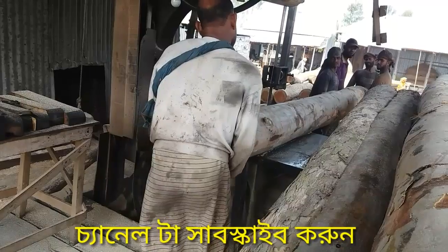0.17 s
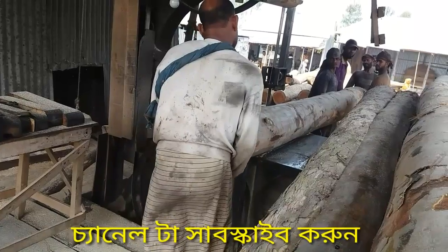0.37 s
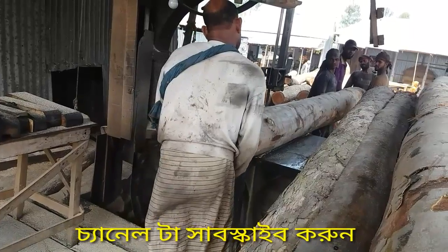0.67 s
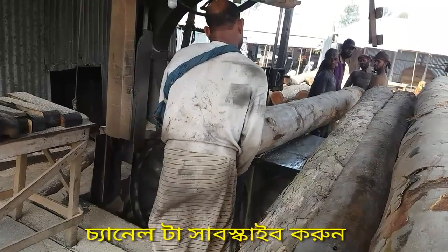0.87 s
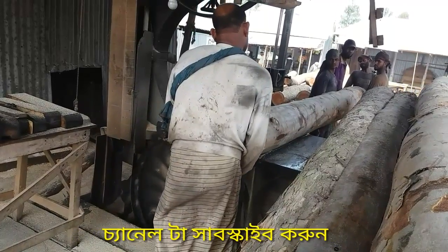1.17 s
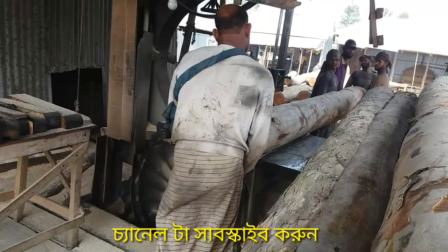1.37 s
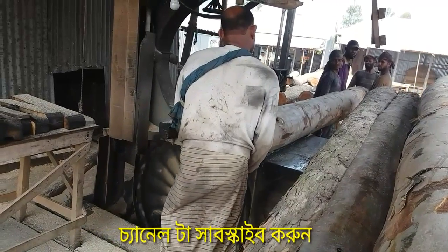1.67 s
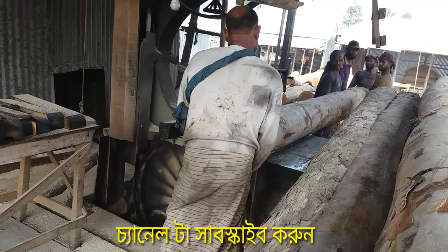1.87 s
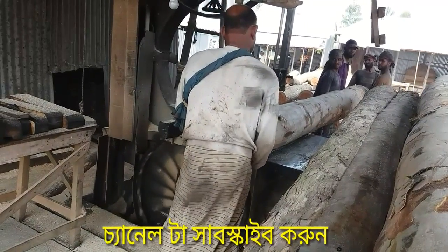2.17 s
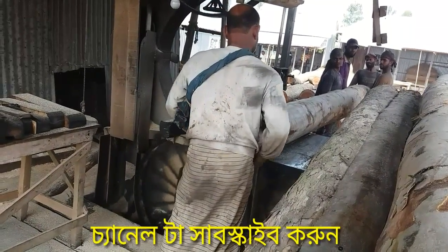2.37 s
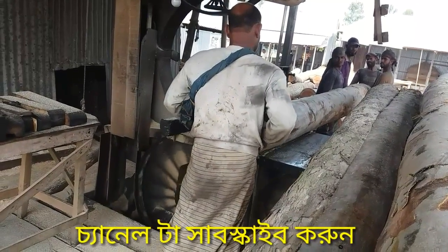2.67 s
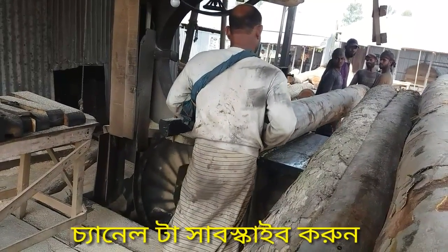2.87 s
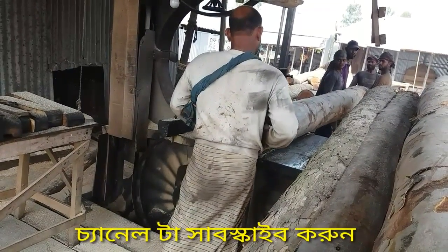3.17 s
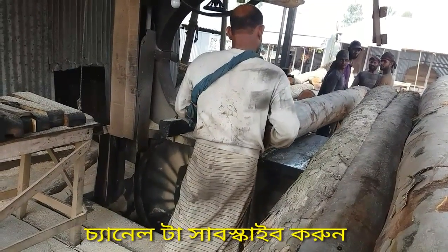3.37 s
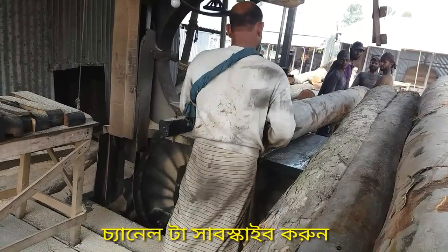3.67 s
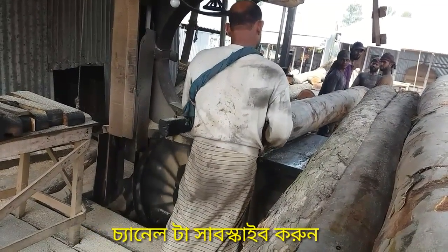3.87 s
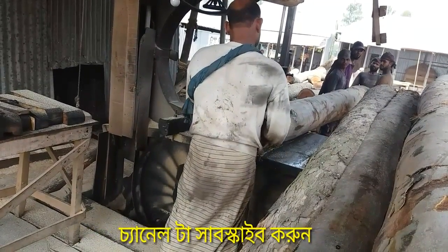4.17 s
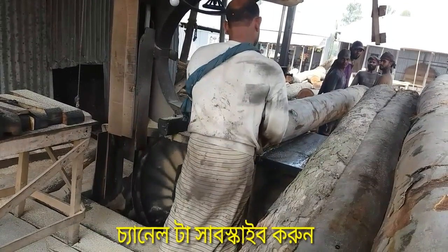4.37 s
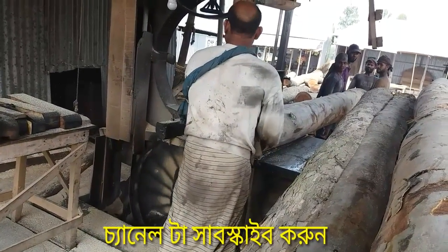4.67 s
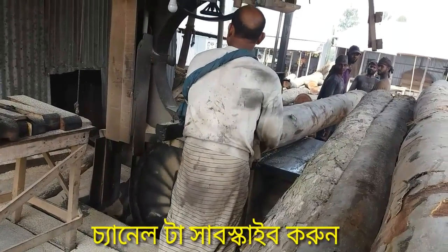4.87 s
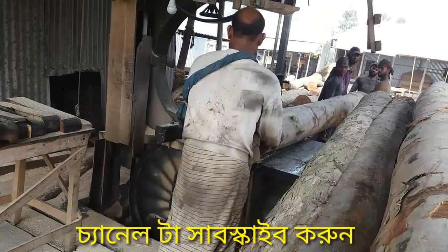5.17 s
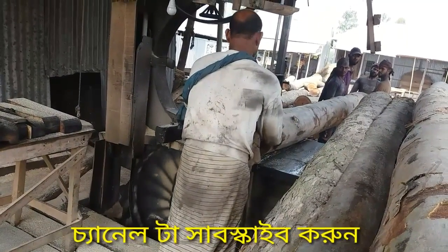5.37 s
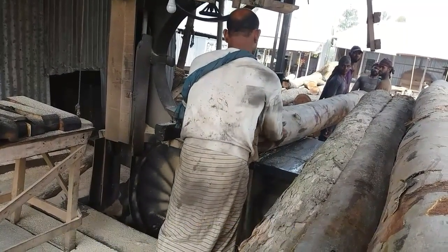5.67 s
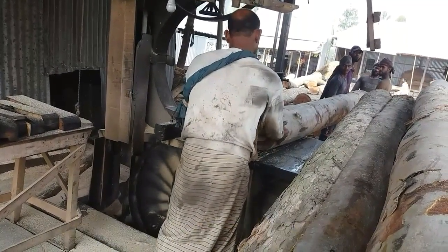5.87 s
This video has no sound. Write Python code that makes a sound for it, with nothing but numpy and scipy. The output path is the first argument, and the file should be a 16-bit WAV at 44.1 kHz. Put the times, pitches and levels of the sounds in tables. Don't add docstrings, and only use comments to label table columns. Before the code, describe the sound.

In an open shed, a large band saw is already deep in a log. A single-cylinder diesel thuds and knocks about eleven times a second beneath a steady roar of belts and wheels. Teeth hiss brightly, the blade rings around 2 kHz and gives short squeaks and rasps. Roughly every 0.8 seconds a fizzy swell ends in a light brush. One mono microphone; everything gradually fades to faint.

```python
import sys
import numpy as np
from scipy import signal
from scipy.fft import rfft, irfft, next_fast_len
from scipy.io import wavfile
from scipy.ndimage import uniform_filter1d, map_coordinates

SR = 44100
rng = np.random.default_rng(int(sys.argv[2]) if len(sys.argv) > 2 else 0)


def wav_record(signal):
    frames = np.transpose(np.atleast_2d(signal))
    bounded = np.clip(frames, -1, 1)
    quanta = np.round(bounded * 32767).astype(np.int16)
    wavfile.write(sys.argv[1], SR, quanta)


def ratio(d):
    e = np.asarray(d, float) / 20
    return 10 ** e


N = 265305
WELD_AT_S, WELD_EVERY_S = .63, .788


def unit(x):
    return x / np.sqrt(np.mean(x ** 2) + 1e-20)


def curves(rows):
    s, *cols = np.transpose(rows)
    return [np.interp(np.arange(N) / SR, s, c) for c in cols]


def wobble(rate):
    knots = rng.standard_normal(int(N * rate / SR) + 4)
    return map_coordinates(knots, [np.arange(N) * rate / SR])


def coloured(x, points):
    m = next_fast_len(len(x) + 8192)
    hz, db = np.transpose(points)
    log_f = np.log(np.fft.rfftfreq(m, 1 / SR) + 1)
    gain = ratio(np.interp(log_f, np.log(hz), db, left=-120, right=-120))
    return irfft(rfft(x, m) * gain, m)[:len(x)]


def rush(points, patchy_db):
    z = signal.stft(rng.standard_normal(N + 512), nperseg=512)[2]
    field = uniform_filter1d(rng.standard_normal(z.shape), size=6, axis=0)
    field = uniform_filter1d(field, size=10, axis=1)
    patchy = signal.istft(z * ratio(patchy_db * unit(field)), nperseg=512)[1][:N]
    return unit(coloured(patchy, points))


def singing(hz, wander_hz, rate):
    pitch = hz + wander_hz * wobble(rate)
    return np.sqrt(2) * np.sin(2 * np.pi * np.cumsum(pitch) / SR)


def diesel_engine():
    # t/s, rate/(engine cycles per s)
    mean_speed = [(0, 11.562), (1.5, 11.364), (3, 11.395), (4.5, 11.4315), (6.02, 11.541)]
    # [(f/Hz, level/dB, t60/s) of what each one rings]
    pushes = [
        (.039, [(150.5, -6.5, .3), (181.5, -.1, .17), (263.4, .1, .08)]),
        (.497, [(99, -7.7, .18), (71.2, -9.2, .3), (236, -12, .25), (168.5, 3.3, .11), (185, 4.5, .035)]),
        (.837, [(134.3, -5.9, .22), (190.7, -6, .3), (305, -.3, .15), (50, -11, .14)]),
    ]
    # f/Hz, level/dB, t60/s
    block_modes = [(365, -15.5, 0.3), (396.2, -13.5, 0.33), (435.4, -17.5, 0.71), (508.4, -15, 0.25),
                   (672, -6, 0.075), (736, -7, 0.19), (812, -3.5, 0.2), (870, 2, .12), (886, -5, 0.2),
                   (953.7, -5.5, 0.13), (1017, 0, 0.22), (1125, -5.5, 0.25), (1196, -4.5, 0.17),
                   (1352, -3, 0.063), (1702, -5.5, 0.062)]
    # delay/s, level/dB
    walls = [(.0085, -4.5), (.018, -2.5), (.031, -7.5)]
    first_cycle, knock_share = -.082, .33
    loop_s, sag_at_s, sag_per_s = .768, .722, .081
    scatter_db, loose_db, knock_db = .5, 2.4, -5.6

    lead = SR // 2
    loop_phase = 2 * np.pi * (np.arange(N) / SR - sag_at_s) / loop_s
    speed = curves(mean_speed)[0] - sag_per_s * np.cos(loop_phase)
    run_in = np.full(lead, speed[0])
    turns = first_cycle + np.cumsum(np.r_[run_in, speed]) / SR - lead * speed[0] / SR
    t = np.arange(SR // 3) / SR
    sizes = rng.standard_normal((100, len(pushes) + len(block_modes)))

    def repeat(shape, share, db):
        starts = np.flatnonzero(np.diff(np.floor(turns - share)))
        train = np.zeros(N + lead)
        train[starts] = ratio(db[:len(starts)])
        return signal.oaconvolve(train, shape)[lead:lead + N]

    thud = knock = 0
    for k, (share, modes) in enumerate(pushes):
        ring = sum((-1) ** (j + 1) * ratio(db - 60 * t / t60) * np.sin(2 * np.pi * hz * t)
                   for j, (hz, db, t60) in enumerate(modes))
        thud = thud + repeat(ring * (1 - np.exp(-t / .002)), share, scatter_db * sizes[:, k])
    for k, (hz, db, t60) in enumerate(block_modes):
        ring = ratio(db - 60 * t / t60) * np.sin(2 * np.pi * (hz * t + .5 * rng.random()))
        ring = ring * (1 - np.exp(-t / .0016))
        knock = knock + repeat(ring, knock_share, loose_db * sizes[:, len(pushes) + k])
    knock = knock + sum(ratio(db) * np.roll(knock, round(s * SR)) for s, db in walls)
    return unit(thud) + ratio(knock_db) * unit(knock)


def machine_roar():
    # f/Hz, level/(dB per Hz)
    roar_colour = [(25, -27), (60, -13), (140, -14.5), (200, -13.5), (290, -5.5), (400, -15.5), (570, -15),
                   (850, -10), (1600, -12.5), (2050, -7.5), (2500, -13.5), (3070, -27), (4000, -15.5)]
    return ratio(-3 + .17 * wobble(rate=8)) * rush(roar_colour, patchy_db=1.0)


def teeth_hiss():
    # f/Hz, level/(dB per Hz)
    hiss_colour = [(2200, -6), (3070, -3.5), (4000, -4.5), (5000, -2.5), (6300, -5.5), (7700, -14),
                   (9500, -16.5), (13200, -19.5)]
    return ratio(-8.0 + .76 * wobble(rate=10)) * rush(hiss_colour, patchy_db=1.22)


def blade_modes():
    # f/Hz, width/Hz, level/dB
    modes = [(1938, 4.1, 4), (1663, 6.4, -3.5), (1836, 16, -3), (2124, 13, 2), (2187, 9.7, 3),
             (2350, 5, -16), (2356, 15, -0.5), (2470, 12, -35), (3270, 25, -4), (3615, 20, -5),
             (4140, 25, 0), (4465, 20, -1)]
    m = next_fast_len(N + SR)
    f = np.fft.rfftfreq(m, 1 / SR)
    body = sum(ratio(db) * 1j * f * np.sqrt(w) / (c * c - f * f + 1j * f * w) for c, w, db in modes)
    settled = irfft(rfft(rng.standard_normal(m)) * body, m)[SR // 2:]
    return unit(settled[:N])


def swelling(rest_db, swells):
    rise_s, fall_s = .011, .018
    t = np.arange(0, N, 64) / SR
    peaks = sum(ratio(db) * np.exp(-np.abs(t - s) / np.where(t < s, rise_s, fall_s)) for s, db in swells)
    return ratio(rest_db + 3 * wobble(rate=16)) + np.interp(np.arange(N) / SR, t, peaks)


def blade_rings():
    # t/s, level/dB, f/Hz
    lower_rest = [(0, -8.5, 1970), (1.45, -12.5, 1960), (1.6, -26, 1965), (2.1, -15, 1965),
                  (2.3, -11.5, 1975), (2.75, -9, 1984), (3.0, -11, 1969), (3.8, -11, 1970),
                  (4.0, -15, 1966), (4.4, -8.5, 1964), (5.3, -11, 1960), (6.02, -8, 1975)]
    # t/s, peak level/dB
    lower_swells = [(.22, -7), (.37, 2.5), (.53, -10), (1.02, 4), (1.26, -9), (1.46, -7), (2.76, -8),
                    (3.08, -11), (3.5, -7), (4.25, -4), (4.77, -3), (4.98, -1), (5.41, 0), (5.95, -8)]
    upper_swells = [(.42, 0), (.51, 0.5), (.75, -3), (1.46, -8), (2.45, -12), (2.76, -6), (2.91, -4),
                    (3.85, -10), (4.25, -3), (4.77, -9), (5.03, -2)]
    rest_db, lower_hz = curves(lower_rest)
    lower = swelling(rest_db, lower_swells) * singing(lower_hz, wander_hz=5.6, rate=32)
    upper = swelling(rest_db - 5, upper_swells) * singing(2029, wander_hz=5.6, rate=32)
    return lower + upper


def rub_list():
    # t/s, f/Hz, length/s, level/dB
    flares = [(0, 3990, .017, -0.5), (0.768, 3900, 0.064, -6), (.82, 4130, 0.15, -11),
              (0.885, 4870, 0.066, -3), (1.6, 4050, 0.11, -4.5), (1.828, 4670, 0.037, 1),
              (2.446, 5410, 0.042, -3.5), (2.482, 5930, .058, -8.5), (2.551, 5200, .039, -5),
              (3.636, 4950, 0.043, -6), (5.206, 5500, 0.048, -5.5)]
    # t/s, f/Hz, length/s, level/dB
    squeaks = [(.105, 4134, 0.075, -5), (.148, 4470, 0.064, -4.5), (.228, 4220, 0.063, -7),
               (0.302, 4392, 0.042, -5), (0.863, 4260, .054, -5), (0.969, 4180, 0.095, -8),
               (1.036, 4520, 0.038, -1.5), (1.251, 4770, .03, -7), (1.56, 3570, 0.044, -8),
               (1.591, 4880, .018, 4), (1.505, 5420, .03, -8), (1.697, 5600, .07, -7.5),
               (1.755, 5000, .03, -10), (2.381, 5100, .018, 0.5), (2.545, 4380, .036, -2),
               (2.624, 4810, .055, 1.5), (2.685, 4260, 0.075, -8), (2.847, 5540, 0.039, -4),
               (3.168, 5090, .052, -3.5), (3.267, 5370, .072, -7), (3.348, 4610, 0.029, -3.5),
               (3.415, 4800, 0.053, -0.5), (4.061, 4800, .041, -7), (4.209, 4680, 0.06, -4),
               (4.91, 4730, 0.047, -7), (4.97, 4930, .041, -5), (5.725, 4565, .041, -7)]
    passes = WELD_AT_S + WELD_EVERY_S * np.arange(7)
    wide = [(s, hz, 1280, length, db) for s, hz, length, db in flares]
    narrow = [(s, hz, 520 + 6500 * length, length, db) for s, hz, length, db in squeaks]
    lead_ins = [(s - .09, 7660, 1340, .055, -19.5) for s in passes]
    welds = [(s, 6800, 1340, .055, -10.5) for s in passes]
    return wide + narrow + lead_ins + welds


def blade_rubs():
    pitch_scatter, time_scatter, cycles = .427, .46, 2.5
    out = np.zeros(N + SR)
    t = np.arange(-SR // 10, SR // 10) / SR
    for s, hz, spread_hz, length, db in rub_list():
        draw = rng.standard_normal((40, 3))
        age = t - np.clip(time_scatter * length * draw[:, :1], -.09, .09)
        loose_hz = max(spread_hz - 420, 120)
        pitch = hz + pitch_scatter * loose_hz * draw[:, 1:2]
        envelope = ratio(1.8 * draw[:, 2:]) * np.exp(-(age * min(loose_hz, 600) / cycles) ** 2)
        slips = envelope * np.sin(2 * np.pi * pitch * age)
        out[round(s * SR):][:len(t)] += ratio(db) * unit(slips.sum(0)) * np.sqrt(5 * length)
    return out[SR // 10:][:N]


def frame_hums():
    # t/s, length/s, f/Hz, level/dB
    hums = [
        (0.04, 0.47, 473, -28.5),
        (0.573, .05, 672, -24),
        (.9, .22, 668, -39),
        (1.85, 0.19, 672, -31),
        (2.75, .07, 473, -31),
        (5.4, 0.39, 473, -50),
    ]
    t = np.arange(N) / SR
    out = np.zeros(N)
    for s, length, hz, db in hums:
        edges = np.clip(np.minimum(t - s, s + length - t) / .019 + .5, 0, 1)
        out += ratio(db) * edges * singing(hz, wander_hz=1.67, rate=6)
    return out


def sharp_teeth_fizz():
    # f/Hz, level/(dB per Hz)
    fizz_colour = [(4800, -12), (5800, 4), (7000, -6), (8600, -12), (10000, -24)]
    before_weld_s, swell_s = .12, .15
    half_loop_s = WELD_EVERY_S / 2
    since_s = np.arange(N) / SR - WELD_AT_S + before_weld_s
    since_s = (since_s + half_loop_s) % WELD_EVERY_S - half_loop_s
    swell = ratio(-18 + 2 * wobble(rate=12)) * np.exp(-(since_s / swell_s) ** 2)
    return swell * rush(fizz_colour, patchy_db=4.0)


def scene():
    # t/s, level/dB
    fade = [(0, -13.5), (1.4, -13), (1.75, -14), (2.75, -14.5), (3.9, -17), (4.6, -20.5), (5.3, -24.5),
            (5.9, -31), (6.02, -33.5)]
    level_db, = curves(fade)
    diesel = ratio(-4.0) * diesel_engine()
    roar = machine_roar()
    blade = ratio(-4.5) * blade_rings() + ratio(-11.5) * blade_modes()
    teeth = teeth_hiss() + ratio(-3.5) * blade_rubs() + sharp_teeth_fizz()
    teeth = teeth * ratio(-.45 * np.clip(np.arange(N) / SR - 3.97, 0, None))
    mono = ratio(level_db) * (diesel + roar + blade + teeth) + frame_hums()
    return np.array([mono, mono])


def stereo_flickers(mono):
    # t/s, low f/Hz, high f/Hz
    flickers = [
        (1.315, 5650, 7000),
        (1.945, 5650, 7000),
        (2.13, 5150, 6400),
        (2.13, 8250, 9700),
        (3.385, 7550, 12500),
        (4.035, 4650, 5800),
        (5.615, 6900, 9700),
    ]
    side, t = np.zeros(N), np.arange(N) / SR
    unrelated = np.roll(mono, SR // 10)
    for s, lo_hz, hi_hz in flickers:
        band = coloured(unrelated, [(lo_hz, 0), (hi_hz, 0)])
        side += ratio(-5.5) * band * np.clip((.03 - np.abs(t - s)) / .008, 0, 1)
    return side


def roll_off(x):
    return signal.sosfilt(signal.butter(12, 13080, fs=SR, output="sos"), x)


def record(dry):
    # f/Hz, level/dB
    mic_response = [(15, -22), (30, -6), (45, -14), (62, -2.5), (20000, 0)]
    mono = coloured(dry[0], mic_response)
    mono = mono / (1 + np.abs(mono / .93) ** 6) ** (1 / 6)
    side = stereo_flickers(mono)
    return roll_off(np.array([mono + side, mono - side]))


dry = scene()
out = record(dry)
wav_record(out)
```